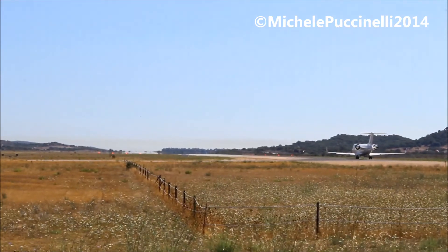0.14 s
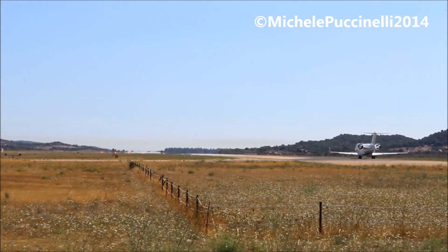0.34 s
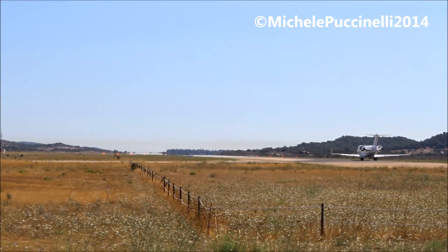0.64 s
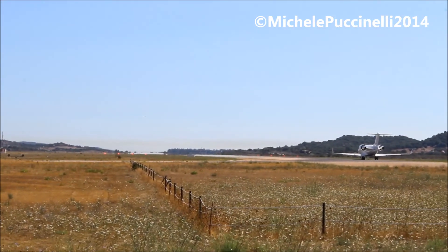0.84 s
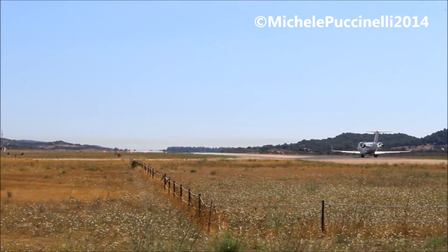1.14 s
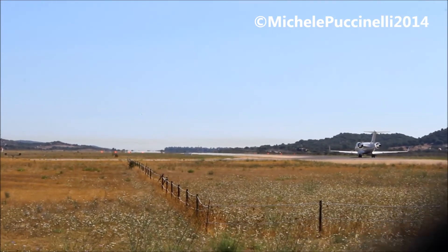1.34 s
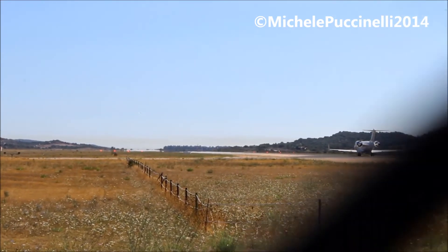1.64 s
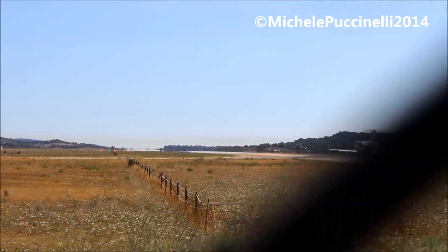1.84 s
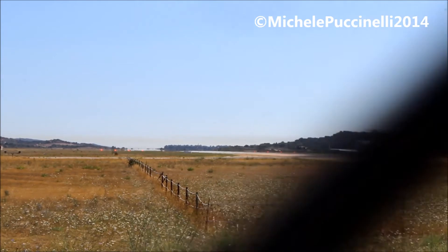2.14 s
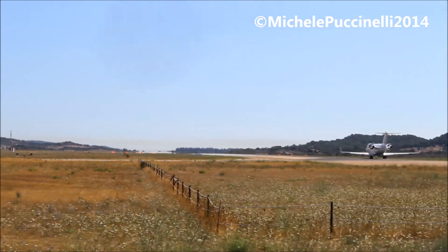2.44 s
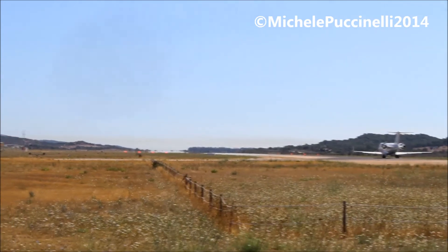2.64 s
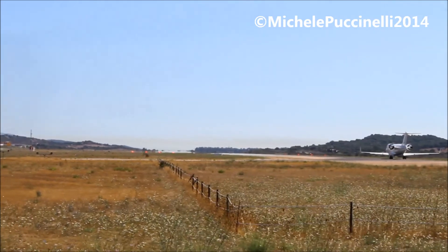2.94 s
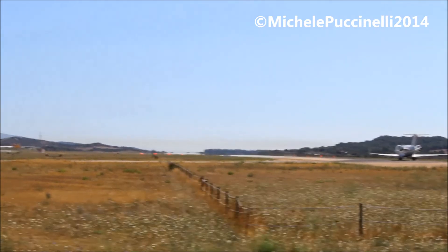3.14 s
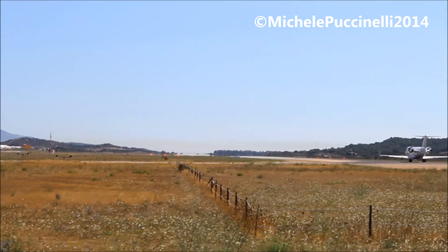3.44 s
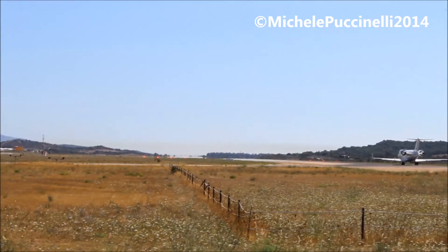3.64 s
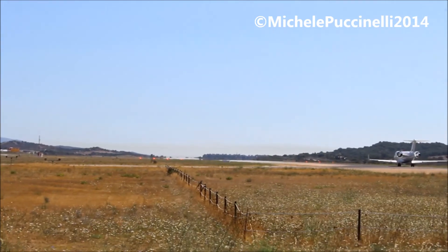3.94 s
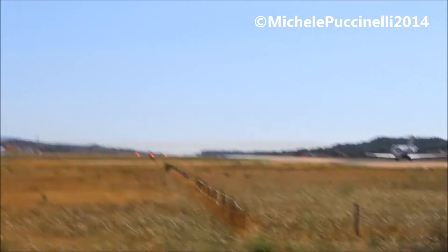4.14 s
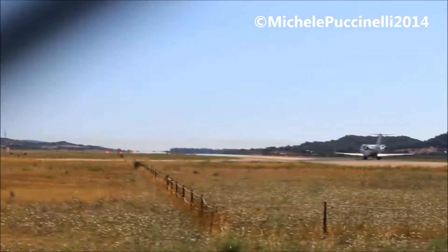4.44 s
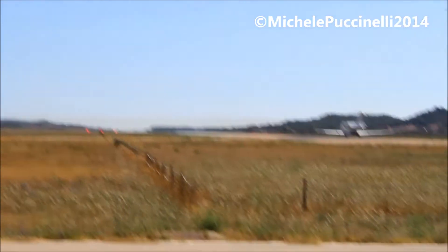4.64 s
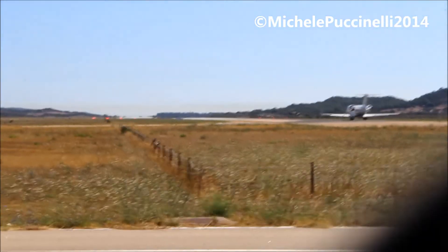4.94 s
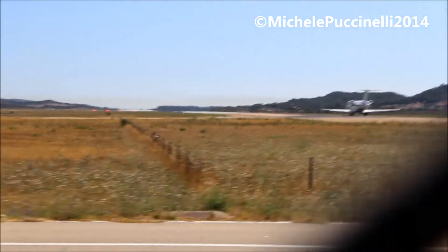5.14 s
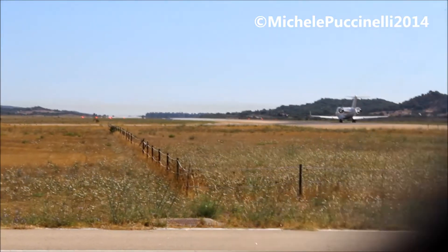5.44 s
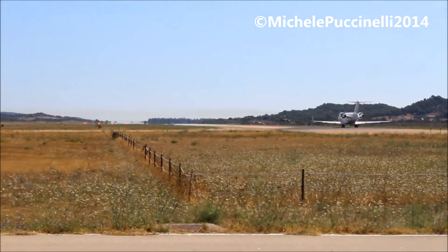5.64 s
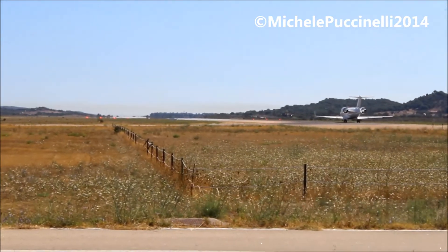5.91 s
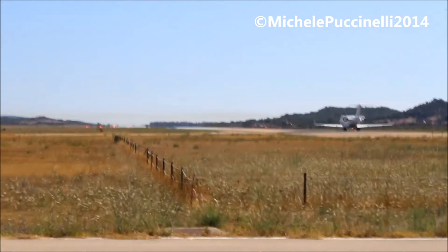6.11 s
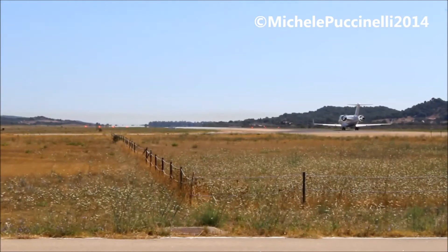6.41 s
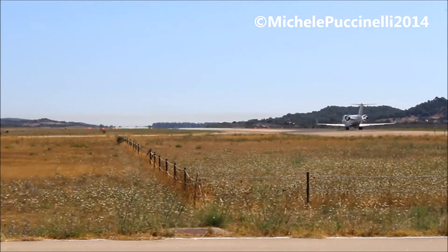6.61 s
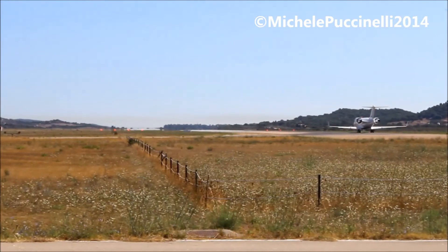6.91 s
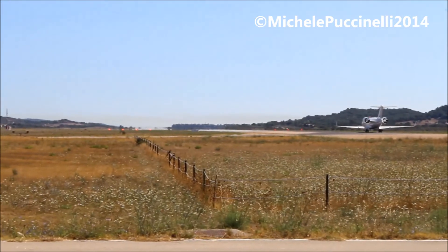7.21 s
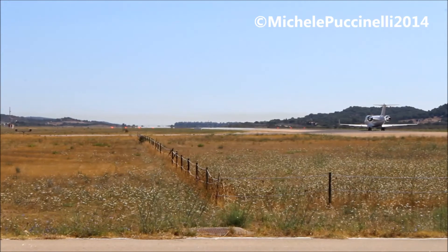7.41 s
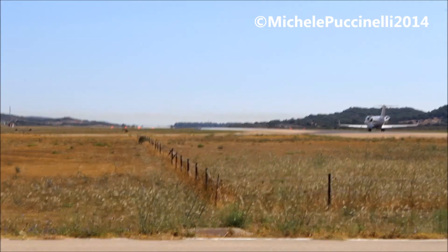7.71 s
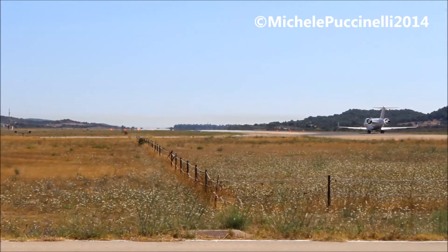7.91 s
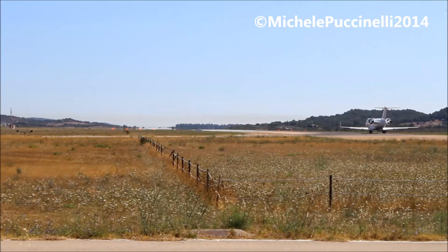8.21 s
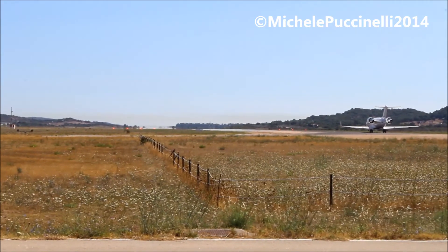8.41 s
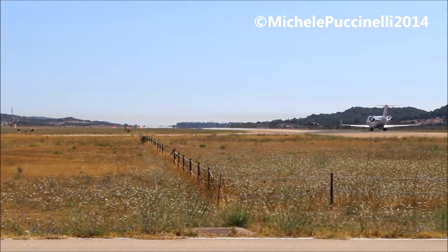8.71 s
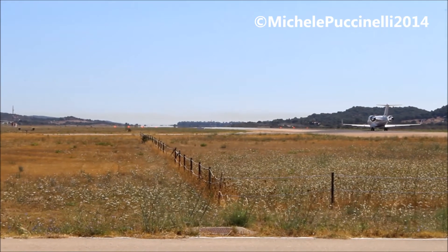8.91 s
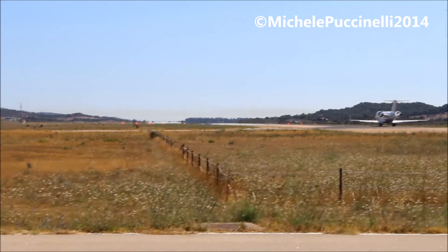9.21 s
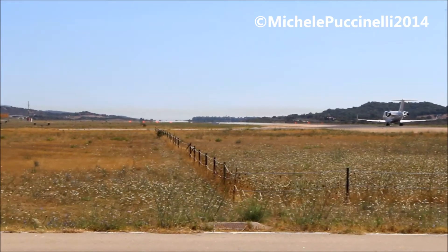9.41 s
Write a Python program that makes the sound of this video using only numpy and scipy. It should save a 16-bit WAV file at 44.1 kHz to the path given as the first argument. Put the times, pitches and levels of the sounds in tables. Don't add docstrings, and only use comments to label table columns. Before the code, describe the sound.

Distant small jet idles with a breathy rush and thin, wavering whine while rough wind thumps and overloads the bare microphone outdoors.

```python
import sys
import numpy as np
from scipy import signal
from scipy.fft import rfft, irfft
from scipy.io import wavfile

SR = 44100
rng = np.random.default_rng(int(sys.argv[2]) if len(sys.argv) > 2 else 0)


def invert_db(level):
    return 10 ** (np.asarray(level, dtype=float) / 20)


def log_audio(samples):
    frames = np.atleast_2d(samples).T
    limited = np.clip(frames, -1, 1)
    pcm = np.round(limited * 32767).astype(np.int16)
    wavfile.write(sys.argv[1], SR, pcm)


N = 421596


def rms_one(x):
    return x / np.sqrt(np.mean(x ** 2) + 1e-20)


def in_time(rows):
    s, *columns = np.transpose(rows)
    return [np.interp(np.arange(N) / SR, s, column) for column in columns]


def at_hz(points, hz):
    points_hz, points_db = np.transpose(points)
    return np.interp(np.log(hz), np.log(points_hz), points_db)


def drift(rate_hz):
    r = np.exp(-2 * np.pi * rate_hz * 40 / SR)
    noise = rng.standard_normal(N // 40 + 2002)
    slow = signal.lfilter([1], [1, -2 * r, r * r], noise)[2000:]
    return np.interp(np.arange(N) / 40, np.arange(len(slow)), rms_one(slow - slow.mean()))


def coloured(spectrum):
    hz = np.maximum(np.fft.rfftfreq(N, 1 / SR), 1)
    return rfft(rng.standard_normal(N)) * invert_db(at_hz(spectrum, hz)), hz


def patchy(spectrum, together_db, own_db):
    noise, hz = coloured(spectrum)
    band = 3 * np.log2(hz / 250)
    out = np.zeros(N)
    for k in range(18):
        share = np.cos(np.pi / 2 * np.clip(band - k, -1, 1)) ** 2
        flicker_db = own_db * (drift(3.2) + 0.2 * drift(36.0))
        out += irfft(noise * share, N) * invert_db(flicker_db)
    return out * invert_db(together_db)


# t/s, whole rush/dB, low rush/dB, colour/(0 facing - 1 turned), shaft whine/dB
TURN = [(0, 1, 4, 0.097, 6), (1, 1, 1.5, 0.073, 7), (2, -1, 2.5, .1, 3), (3, 0, 0, 0.21, 1.5),
        (4, 0, 1.5, 0.97, 2.5), (5, -3.5, 3.5, 0.068, -12), (6, 0, 3, 0.41, -1), (6.5, 1.5, 0.5, 0.46, 4),
        (7, 1.5, 0.5, 1, -3), (8, -1, 3, 0.89, -11), (8.6, -2, 6.5, 0.2, 1), (9.56, -1, -0.5, 0.2, 5)]
# f/Hz, density/(dB per Hz)
RUSH_LOW = [(300, -30), (550, -18), (660, -6), (880, -8), (980, -15), (1080, -5.5), (1200, -1),
            (1350, -7.5), (1480, -13), (1800, -10.5), (1950, -13.5), (2170, -20), (2500, -16)]
RUSH_FACING = [(2500, -19), (3100, -16.5), (3600, -18), (4150, -17.5), (4600, -22), (5200, -22),
               (6000, -29), (7500, -36.5), (9000, -41), (11000, -58)]
RUSH_TURNED = [(2500, -16.5), (3100, -17.5), (3500, -14.5), (4150, -20), (4600, -24), (5200, -25.5),
               (6000, -33.5), (7500, -37.5), (9000, -43.5), (11000, -51.5)]


def rush():
    whole_db, low_db, turned, _ = in_time(TURN)
    turned = np.clip(turned, 0, 1)
    together_db = 0.5 * drift(4.2)
    low = patchy(RUSH_LOW + [(2600, -52.5)], together_db + low_db, own_db=-0.97)
    facing = patchy([(2400, -59.0)] + RUSH_FACING, together_db, own_db=2.04)
    away = patchy([(2400, -60.0)] + RUSH_TURNED, together_db, own_db=1.86)
    return invert_db(whole_db - 16.0) * (low + np.sqrt(1 - turned) * facing + np.sqrt(turned) * away)


def fan(pitch, level):
    hz = in_time(pitch)[0] + 0.85 * drift(10.0)
    level_db = in_time(level)[0] + 2.0 * drift(19.0)
    return np.sqrt(2) * invert_db(level_db) * np.sin(2 * np.pi * np.cumsum(hz) / SR)


# t/s, f/Hz
LEFT_HZ = [(0, 1804), (1.3, 1802), (2.5, 1804), (4.9, 1808), (6.5, 1805), (9.56, 1806)]
RIGHT_HZ = [(0, 1860), (2.9, 1863), (4, 1859), (6, 1860), (7.2, 1865), (8.5, 1861), (9.56, 1861)]
# t/s, level/dB
LEFT_DB = [(0, -36), (.7, -38), (1.25, -35), (2.2, -42), (2.5, -40.5), (3.0, -36.5), (3.85, -38.5),
           (4.05, -44.5), (4.4, -39), (4.87, -45), (5.09, -52), (5.3, -38.5), (6.1, -56), (6.36, -42),
           (6.92, -62), (8.2, -58), (8.52, -52), (8.95, -64)]
RIGHT_DB = [(0, -35.5), (.34, -33), (.5, -43), (.75, -36.5), (1.2, -39), (1.89, -46), (2.1, -40),
            (2.55, -45), (3.199, -41.5), (3.75, -40), (4.15, -41), (5.3, -41), (6.1, -36), (6.8, -38.5),
            (7.7, -38), (8.36, -35.5), (8.52, -32.5), (9.0, -41.5)]


def fans():
    return fan(LEFT_HZ, LEFT_DB) + fan(RIGHT_HZ, RIGHT_DB)


# f/Hz, level/dB, on shaft/(1 if a multiple of the accessory shaft)
WHINES = [(934, -58, 0), (2066, -57, 1), (3100, -58, 1), (4134, -67, 1), (4937, -67, 0), (4999, -66, 0),
          (5842, -75, 0), (5930, -72, 0), (6861, -81, 0), (7216, -75.5, 0), (7306, -72.5, 0),
          (7640, -80, 0), (7750, -81, 0)]


def whines():
    out = np.zeros(N)
    shaft_db = in_time(TURN)[3]
    for hz, line_db, on_shaft in WHINES:
        phase = 2 * np.pi * np.cumsum(hz * (1 + 0.00066 * drift(5.4))) / SR
        level_db = line_db + on_shaft * shaft_db + 2.2 * drift(1.4)
        out += np.sqrt(2) * invert_db(level_db) * np.sin(phase)
    return out


# t/s, buffet/dB, small eddies re buffet/dB
WIND = [(0, -22.5, -8), (.5, -20, -8), (.95, -21.5, -1), (1.35, -27.5, -5.5), (1.72, -31, -5),
        (1.9, -20, -5.5), (2.3, -10.5, 0.5), (3.1, -10.5, -4), (3.55, -15.5, -2.5), (4.3, -11, -7),
        (4.55, -23, -2.5), (5.15, -21.5, -5), (5.4, -8.5, -3), (6.0, -9.5, -1), (6.3, -19, -9),
        (7.0, -19, -7), (7.4, -30.5, -15), (9.56, -21.5, -1)]
# centre t/s, half length/s, rise/dB, small eddies added/dB
PUFFS = [(2.315, 0.032, -8.5, -9), (0.786, 0.054, 6.5, -3.5), (5.778, 0.058, 3.5, 3.5),
         (1.242, 0.017, 8, 6), (1.836, 0.029, 13, 1), (1.996, 0.039, 8.5, 2.5), (2.085, 0.062, 3.5, 5),
         (2.421, 0.071, 4, 6), (2.648, 0.023, 2.5, -1), (4.723, .1, 5.5, -2), (3.274, .03, 3, 8),
         (3.345, .025, -9, 0), (3.419, .025, 6.5, -7), (3.941, .035, 8, 4), (4.053, 0.033, 2, 12),
         (4.458, .03, 6, 9.5), (4.901, 0.06, -9, -8), (4.988, 0.023, 7.5, 2), (5.152, 0.026, -12, -3),
         (5.073, .025, 13, -1), (5.373, 0.029, 5, -0.5), (5.627, 0.026, -2.5, 4.5), (6.535, 0.016, 13, -13),
         (6.92, 0.082, 8.5, 4.5), (7.25, 0.032, 8.5, -3), (7.98, 0.034, 13.5, -5), (8.697, .08, 5, -15),
         (8.844, 0.05, -16.5, -1), (9.239, 0.016, -8, -5), (9.341, 0.19, 12, 3.5)]


def gusts():
    buffet_db, small_db = in_time(WIND)
    t = np.arange(N) / SR
    for s, half_s, rise_db, fine_db in PUFFS:
        bell = np.exp(-((t - s) / half_s) ** 2)
        buffet_db = buffet_db + rise_db * bell
        small_db = small_db + fine_db * bell
    return buffet_db, small_db


def swing(hz, turns):
    u = np.arange(-2 * SR / hz, 2 * SR / hz) * 2 * np.pi * hz / SR
    shape = np.sin(u) * np.exp(-(u / (np.pi * turns)) ** 2)
    return shape / shape.max()


# pulse f/Hz, share/dB, rate/(eddies per s)
EDDIES = [(38, -21, 190), (60, -7.5, 130), (91.6, -2, 76), (133, -1, 90), (186, -0.5, 110),
          (284.6, -4, 130), (428, -10, 160), (700, -17, 120), (1090, -25.5, 90)]


def buffeting():
    buffet_db, small_db = gusts()
    swell_db = buffet_db - buffet_db.mean()
    heave_db = -27 + 0.05 * swell_db - 2 * drift(3.7)
    clumps = drift(30.0)
    crowd = 1.6 * invert_db(0.25 * swell_db)
    out = np.zeros(N)
    for hz, share_db, per_s in EDDIES:
        small = np.clip(np.log(hz / 190) / np.log(2.2), 0, 1.15)
        large = np.clip(np.log(120 / hz) / np.log(1.8), 0, 1)
        born = rng.random(N) < crowd * per_s / SR
        sizes = invert_db(2.99 * np.minimum(rng.exponential(1, N), 4)) * rng.choice([-1, 1], N)
        train = signal.oaconvolve(born * sizes, swing(hz, turns=0.98), "same")
        train = rms_one(train / np.sqrt(crowd))
        level_db = (1 - large) * (buffet_db + 2.97 * clumps) + large * (heave_db + 1.5)
        fine_db = small * (small_db + 2.5 + 2.4 * clumps)
        out += train * invert_db(level_db - 4.5 + share_db + fine_db)
    return 1.3 * np.tanh(out / 1.3)


# t/s, peak/dB, pulse f/Hz
THUMPS = [(0.784, 0.5, 204), (1.831, -3, 220), (2.115, -1.5, 230), (2.213, 3, 189), (2.392, 4, 175),
          (2.485, 4.5, 173), (2.646, 5, 260), (2.868, 2.5, 303), (2.925, 6, 280), (3.265, 3, 245),
          (3.286, 1.5, 181), (3.397, 3.5, 198), (3.651, -3.5, 220), (3.785, -2.5, 246), (3.902, 1, 215),
          (4.028, 1.5, 230), (4.427, 3.5, 153), (4.956, -1, 199), (4.998, 3.5, 240), (5.32, -15, 215),
          (5.339, 0.5, 209), (5.628, 4.5, 264), (5.755, 5.5, 231), (6.007, 3, 213), (6.11, 2, 250),
          (6.507, -1, 260), (6.874, -1.5, 186), (8.361, -3, 210), (9.41, -0.5, 207)]
# t/s, peak/dB, pulse f/Hz
MORE_THUMPS = [(0.293, -15, 186), (0.58, -9, 205), (1.056, -8.5, 159), (1.693, -10.5, 149), (1.795, -9.5, 150),
               (1.954, -2, 195), (2.357, 1.5, 301), (2.841, -0.5, 150), (3.023, 3, 199), (3.137, -2.5, 227),
               (3.324, -0.5, 151), (3.469, -1.5, 178), (4.795, -8, 146), (5.174, -5.5, 179), (5.2, -3.5, 176),
               (5.396, 4.5, 292), (5.585, 0, 201), (6.077, 4, 217), (6.227, -13, 151), (7.123, -13.5, 278),
               (7.935, -6.5, 151), (8.221, -9.5, 144), (8.664, -7.5, 206), (8.961, -5.5, 312),
               (9.06, -13.5, 174), (9.116, -8, 198), (9.277, 2, 355), (9.356, -2, 433), (9.427, 0, 276),
               (9.48, -2, 272)]
# t/s, peak/dB, pulse f/Hz
OPENING = (0.0014, -4, 123)
# t/s, peak/dB, pulse f/Hz
SLAM = [
    (9.2028, 4.5, 235),
]


def thumps():
    lead = SR // 10
    out = np.zeros(N + 2 * lead)
    singles = [(s + 0.00406, peak_db, hz) for s, peak_db, hz in THUMPS + MORE_THUMPS]
    signs = [1, *rng.choice([-1, 1], len(singles))]
    for (s, peak_db, hz), sign in zip([OPENING] + singles, signs):
        broad = invert_db(-4.0) * swing(hz, turns=0.95)
        sharp = invert_db(-10.5) * swing(1.56 * hz, turns=0.53)
        crest = invert_db(-27.0) * swing(3.9 * hz, turns=0.5)
        for pulse in (broad, sharp, crest):
            at = lead + round(s * SR) - len(pulse) // 2
            out[at:at + len(pulse)] += sign * invert_db(peak_db) * pulse
    for s, peak_db, hz in SLAM:
        pulse = swing(hz, turns=1.9)
        at = lead + round(s * SR) - round(SR / hz)
        out[at:at + len(pulse)] -= invert_db(peak_db) * pulse
    return out[lead:lead + N]


def gain():
    threshold_db, duck_share, most_step_db = -6.5, 0.88, 9
    lag_s, attack_s, release_db_per_s = 0.008, 0.015, 25.5
    over_db = np.zeros(N)
    climb_db = release_db_per_s * np.arange(N) / SR
    last_s = last_db = 0
    for s, peak_db, _ in sorted(THUMPS + SLAM + MORE_THUMPS):
        left_db = max(last_db - release_db_per_s * (s - last_s), 0)
        wanted_db = duck_share * (peak_db - threshold_db)
        last_s, last_db = s, np.clip(wanted_db, left_db, left_db + most_step_db)
        over_db[round((s + lag_s) * SR)] = last_db
    duck_db = np.maximum.accumulate(over_db + climb_db) - climb_db
    r = np.exp(-1 / (attack_s * SR))
    return invert_db(-signal.lfilter([1 - r], [1, -r], duck_db))


# start t/s, length/s, end level/dB
BOUTS = [
    (3.65, 0.27, -65.5),
    (4.155, .8, -70),
    (6.4, 0.25, -65),
    (6.68, .24, -64),
    (7.08, .3, -67),
    (7.603, .4, -64.5),
]


def bouts():
    out = np.zeros(N)
    t = np.arange(N) / SR
    for s, length_s, end_db in BOUTS:
        edges = np.clip(np.minimum(t - s, s + length_s - t) / 0.04, 0, 1)
        out += edges * invert_db(end_db - 6.5 * np.clip(1 - (t - s) / length_s, 0, 1))
    return out


def rasp():
    puffs = (0.5 + 0.5 * np.sin(2 * np.pi * 25 * np.arange(N) / SR - 0.8)) ** 1.5
    spectrum, _ = coloured([(10000, -36.5), (11500, 1), (13800, 5.0), (15600, -4.5)])
    return bouts() * rms_one(irfft(spectrum, N) * puffs)


def ticks(events, modes):
    out = np.zeros(N)
    chance_db = rng.normal(0, 2.2, (len(events), len(modes)))
    at = [round(s * SR) for s, _ in events]
    peak_db = np.array(events)[:, 1]
    for k, (hz, t60_s, level_db) in enumerate(modes):
        clicks = np.full(N, 1e-18)
        clicks[at] = invert_db(peak_db + level_db + chance_db[:, k])
        r, w = invert_db(-60 / (t60_s * SR)), 2 * np.pi * hz / SR
        mode = [0, np.sin(w), 0, 1, -2 * r * np.cos(w), r * r]
        out += 2 * np.e * (1 - r) * signal.sosfilt([mode, mode], clicks)
    return out


# t/s, peak/dB
STROKES = [(7.7494, -50), (7.7874, -51), (7.8206, -48), (7.8634, -48), (7.9424, -47), (7.9992, -46),
           (8.0157, -45), (8.0416, -43), (8.0671, -40), (8.0925, -41), (8.1199, -42), (8.1459, -45)]
# f/Hz, t60/s, level/dB
WING = [(11600, 0.0068, -6), (12400, 0.0043, -4), (13600, 0.003, -8)]


def leg_strokes():
    return ticks(STROKES, WING)


# t/s, peak/dB
CREAKS = [
    (6.0057, -41),
    (6.018, -39),
    (6.023, -44),
    (9.422, -38),
]


def creaks():
    shell = [(8000, 0.003, -7), (9900, 0.0047, -9.0), (11300, 0.0027, -11)]  # f/Hz, t60/s, level/dB
    return ticks(CREAKS, shell)


# f/Hz, density/(dB per Hz)
HISS = [(300, 4), (6000, -8.5), (10000, -2), (12000, 1), (15500, 2)]


def hiss():
    return invert_db(-61.5) * rms_one(irfft(coloured(HISS)[0], N))


def scene():
    aircraft = rush() + fans() + whines()
    wind = buffeting() + thumps()
    near = rasp() + leg_strokes() + creaks()
    return (aircraft + wind + near)[None]


def low_pass(x):
    return signal.sosfilt(signal.butter(12, 15720, fs=SR, output="sos"), x)


def record(dry):
    low_cut = signal.butter(2, 28.0, "high", fs=SR, output="sos")
    top_cut = signal.cheby2(18, 25, 16060, fs=SR, output="sos")
    x = signal.sosfilt(low_cut, (dry + hiss()) * gain())
    mix = signal.sosfiltfilt(top_cut, np.clip(x, -1, 1))
    return low_pass(mix)


dry = scene()
out = record(dry)
log_audio(out)
```